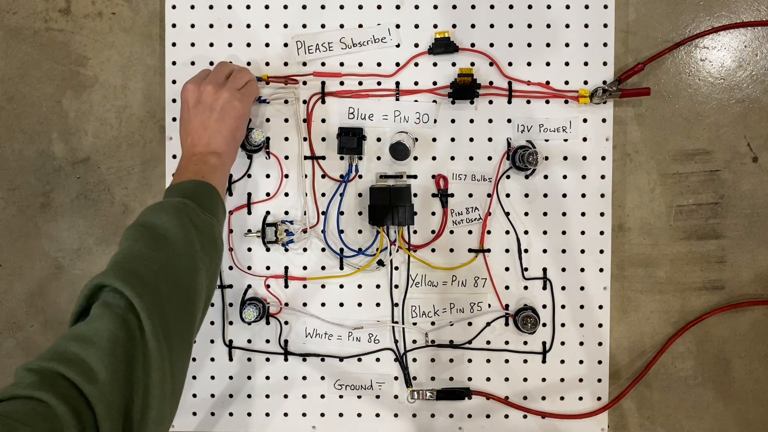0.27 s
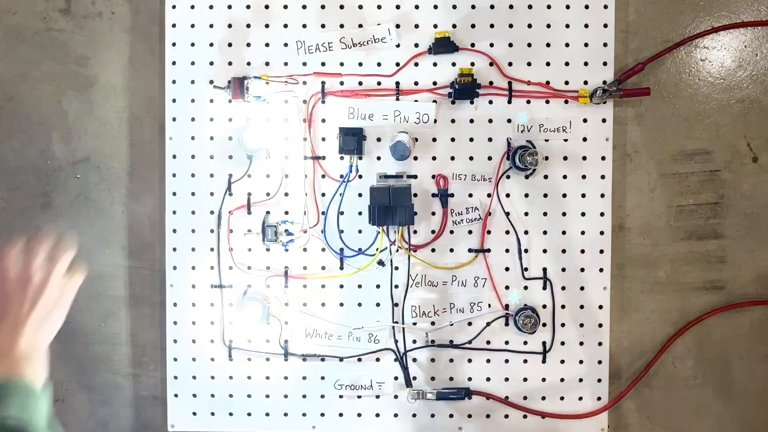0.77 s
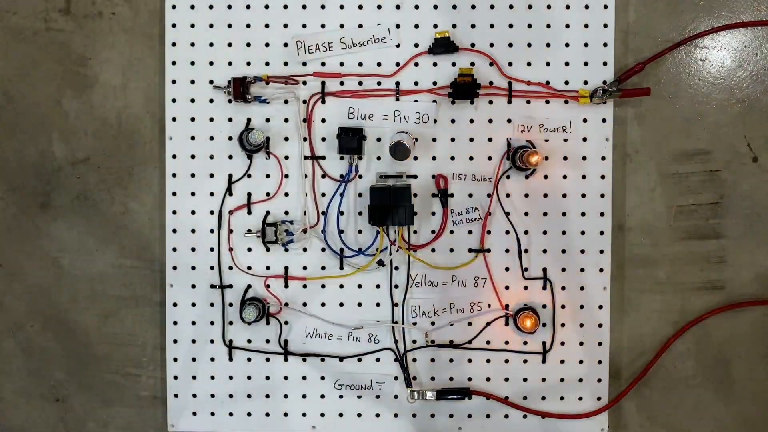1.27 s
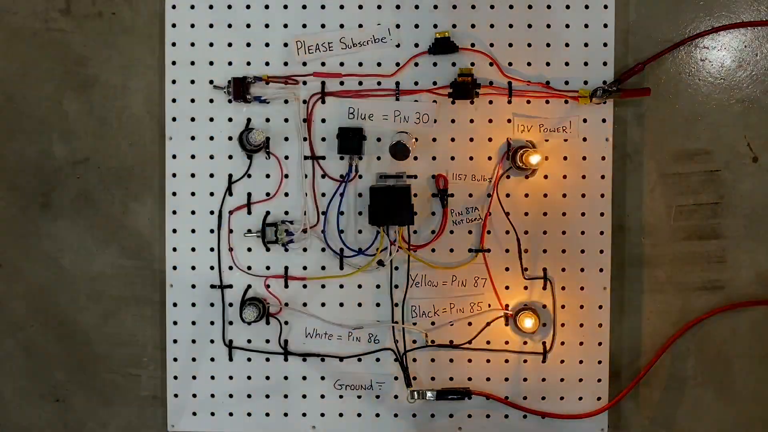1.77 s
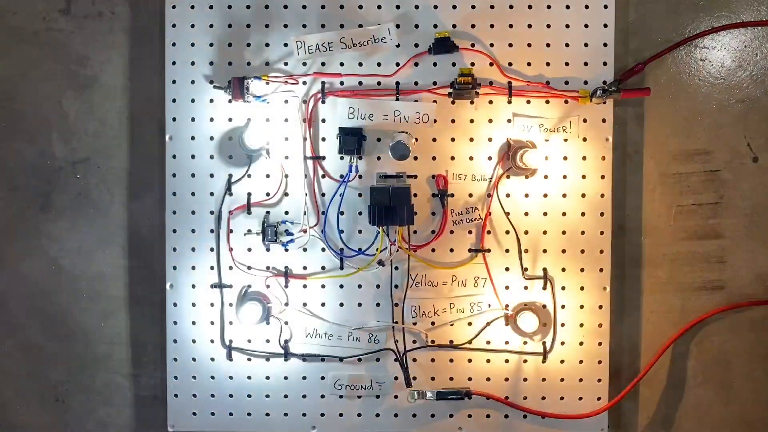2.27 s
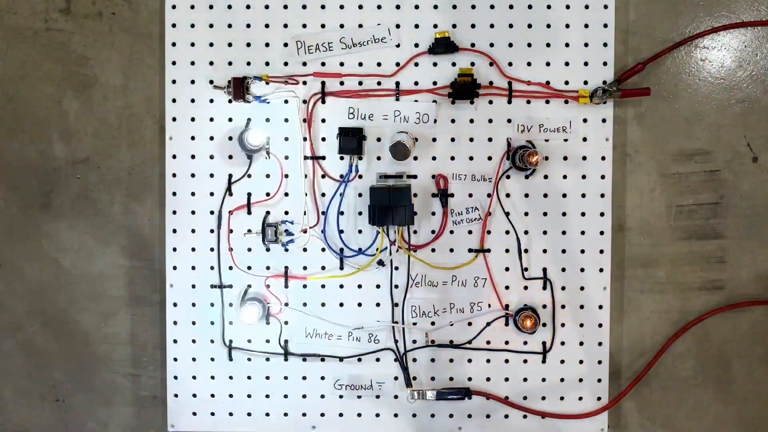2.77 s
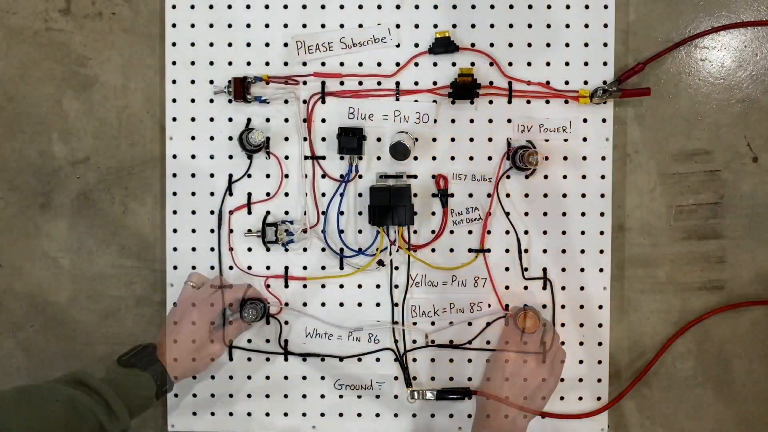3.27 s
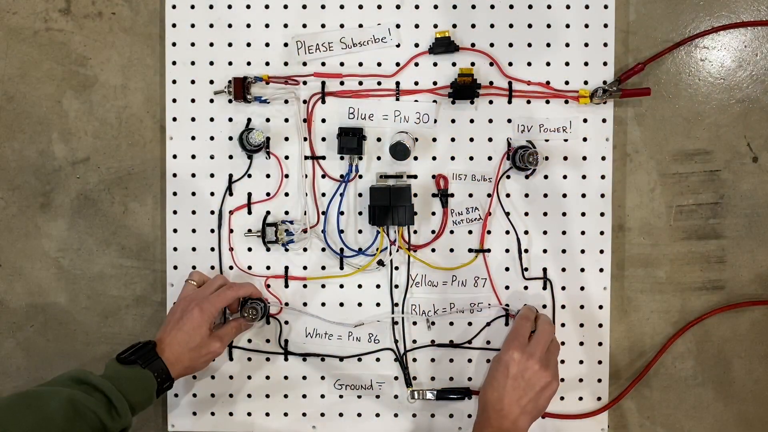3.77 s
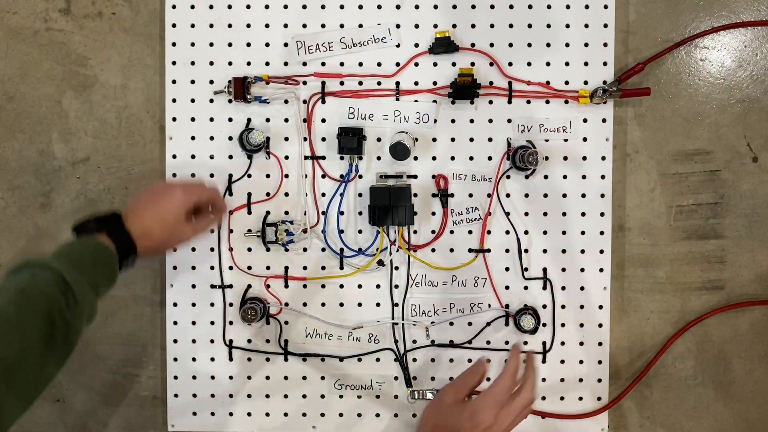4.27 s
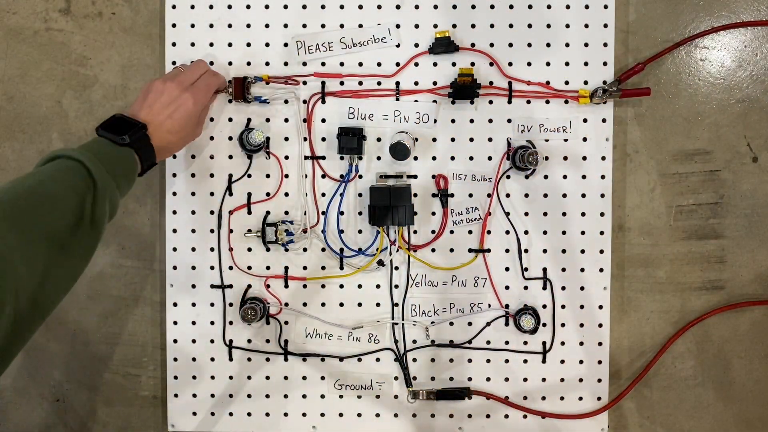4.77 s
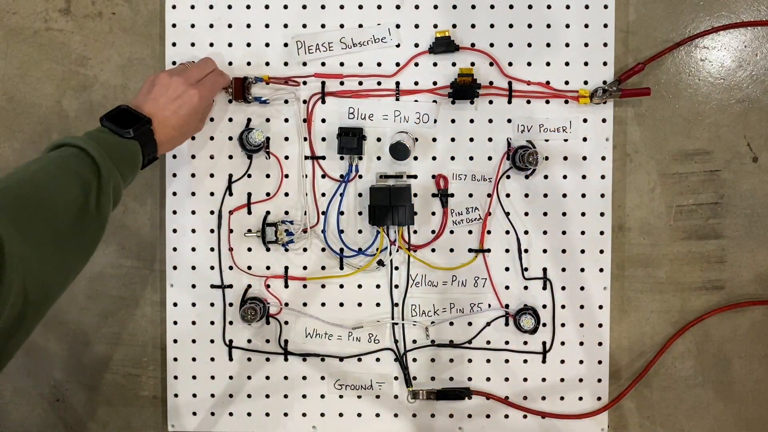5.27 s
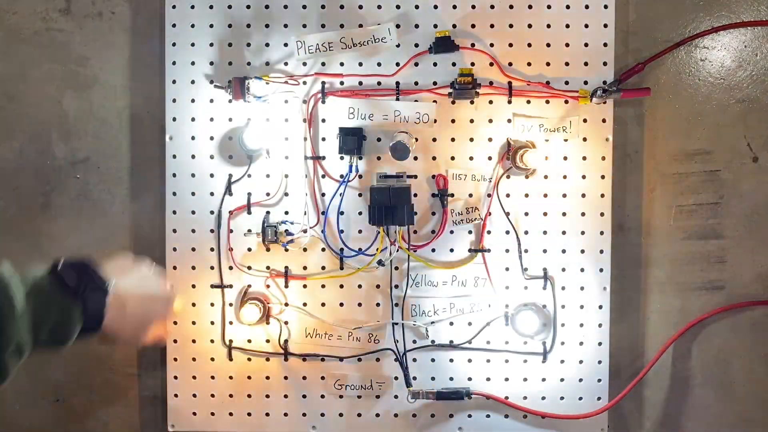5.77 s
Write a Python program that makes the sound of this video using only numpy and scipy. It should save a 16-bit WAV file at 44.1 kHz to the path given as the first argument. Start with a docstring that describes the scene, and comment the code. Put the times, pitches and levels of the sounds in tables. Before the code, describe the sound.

A toggle switch snaps sharply twice in a hard, ringing garage, with finger knocks, bulb scrapes, tiny dry ticks and a low hum arriving late.

```python
"""Over faint hiss, sleeve rustle and a far idling engine, fingers knock and fumble at a pegboard; a toggle switch
snaps, twice in all, and the hard garage rings on. Small dry ticks come and go; bulbs scrape in their sockets; a far
crow caws five times; a truck rolls by, road roar swelling through the wall, then a steady low hum.
Hiss, rustle and roar are shaped random spectra; engines and hum are wavering tones; rumble, crow and scrapes are
resonated noise; knocks, ticks and thuds are resonated puffs; the switch is noise chatter into decaying modes."""
import sys
import numpy as np
from scipy import signal
from scipy.fft import rfft, irfft, next_fast_len
from scipy.io import wavfile
from scipy.ndimage import uniform_filter1d

SR = 44100
rng = np.random.default_rng(int(sys.argv[2]) if len(sys.argv) > 2 else 0)


def inscribe(sig):
    """Save sig as 16-bit PCM at rate SR to the path in sys.argv[1].

    A 1-D sig is mono; a 2-D sig holds one channel per row.
    Samples are clipped to [-1, 1] before scaling.
    """
    pcm = np.round(np.clip(np.atleast_2d(sig).T, -1, 1) * 32767)
    wavfile.write(sys.argv[1], SR, pcm.astype(np.int16))


N = 265085
FRAME, HOP, BLOW, CALL = 1024, 256, 3000, 12000  # lengths in samples

# Levels are those at the source, before the filters of scene() and record().
# background air spectrum: f/Hz, relative density/dB per Hz
AIR_SPECTRUM = [(18, -27.5), (40, -10), (80, -5.5), (150, -15), (280, -19), (440, -26), (620, -23),
                (720, -30), (1400, -37.5), (1800, -45.5), (5000, -45.5), (10000, -55.5), (15800, -51)]
AIR_DB = -65.5

# far idling engine: t/s, level/dB
IDLE = [(0, -65), (.1, -64), (.75, -62), (.85, -50.5), (.93, -82), (1.01, -50), (1.35, -50), (1.58, -56.5),
        (2.18, -45), (2.27, -51.5), (2.4, -62.5), (2.63, -50.5), (2.87, -56.5), (3.1, -74)]
IDLE_HZ, IDLE_OCTAVE_DB, IDLE_UNEVEN_DB = 73.4, -23.5, 2  # octave is relative to the lowest tone
# truck engine, from 4.8 s a steady low hum: t/s, lowest tone f/Hz, level/dB of multiples 1, 2, 3
TRUCK_THEN_HUM = [(2.9, 66.3, -76, -71.5, -65), (3.12, 65.62, -58, -56, -58.5),
                  (3.42, 65.7, -39, -46.5, -44.5), (3.57, 65.88, -42, -52.5, -61),
                  (3.7, 65.1, -42.5, -51.5, -45), (4.1, 64.36, -39, -50.5, -64),
                  (4.42, 64.1, -40, -45, -64), (4.64, 63.07, -47, -49.5, -49.5),
                  (4.8, 65.16, -29.5, -50.5, -78), (4.95, 66, -28.5, -56, -74), (5.3, 66.64, -33, -56, -79),
                  (5.66, 66.7, -32, -58.5, -63), (5.9, 67, -29, -62, -75), (6.01, 65.4, -30, -61, -73)]
TRUCK_THEN_HUM_UNEVEN_DB = 1.3
# low booms gliding as the truck pulls: t/s, length/s, from f/Hz, to f/Hz, level/dB
GLIDES = [(4.33, 0.352, 42, 68, -32), (4.12, 0.249, 58.4, 86.4, -30.5), (4.65, 0.27, 262, 255.6, -48),
          (3.48, .17, 300, 350, -45.5), (3.5, 0.67, 230, 400, -54.5)]

# passing traffic: t/s, road roar level/dB, ground rumble level/dB
TRAFFIC = [(2.5, -77, -68), (2.88, -70.5, -61), (3.079, -60.5, -51), (3.641, -46, -51), (3.85, -50, -47.5),
           (4.28, -49.5, -46), (4.66, -53, -44), (5.2, -54.5, -60.5), (6.01, -53, -50.5)]
# road roar spectrum: f/Hz, relative density/dB per Hz
ROAR_SPECTRUM = [(40, -20.5), (90, -8), (160, -17.5), (220, -11.5), (440, -22.5), (700, -27.5),
                 (1500, -40.5), (5000, -62), (9000, -75.5), (15000, -76.5)]
RUMBLE_LUMPS_DB = -4.5

# crow: t/s, length/s, level/dB
CAWS = [(0.565, 0.25, -67), (0.849, 0.19, -65.5), (1.143, 0.17, -64), (1.462, 0.19, -64), (1.78, 0.18, -63)]
# beak resonances: f/Hz, width/Hz, relative level/dB, 1/e fade/s, delay/s
BEAK = [(1287, 220, 1.5, 0.38, .015), (1418, 144, 2.5, 0.088, .02), (1793, 140, -10, 0.11, 0.0316),
        (2050, 370, -3.5, 0.07, 0.027)]
# slightly hoarse note opening each caw; peak is relative to the caw level
PIP_HZ, PIP_RISE_HZ_PER_S, PIP_S, PIP_PEAK_DB, PIP_UNEVEN_DB = 1745, 600, .06, 1, 1.5

# sleeve and wire rustle, swelling and dying away: t/s, level/dB
RUSTLE = [(0, -73), (.12, -94.5), (.24, -82), (0.449, -72.5), (.6, -80.5), (1.0, -77), (1.3, -79.5),
          (1.6, -83.5), (1.76, -90), (2.2, -96), (2.4, -101.5), (3.499, -100), (3.86, -73.5), (4.2, -76),
          (5.13, -76), (5.501, -72.5), (5.56, -78), (6.01, -76)]
# cloth spectrum: f/Hz, relative density/dB per Hz
CLOTH_SPECTRUM = [(700, -23), (1500, 6), (2700, -1.5), (3900, -4), (5200, -4.5), (6600, -7.5),
                  (9000, -11.5), (11500, -8), (15800, -12.5)]
# sleeve dragging along an edge: t/s, length/s, broad hiss level/dB, centre f/Hz, width/Hz, pitched hiss level/dB
SWISHES = [(1.017, 0.26, -76.5, 2630, 1200, -83), (3.876, 0.22, -70.5, 3800, 600, -66),
           (4.768, 0.22, -68, 5120, 920, -64.5)]

# small dry ticks: t/s, peak/dB, centre f/Hz, 1/e fade of the trailing hiss/s
TICKS = [(1.0394, -57, 3890, .03), (1.6334, -45, 9300, .008), (1.7181, -52, 4700, .03),
         (2.0843, -49, 8600, .05), (2.1804, -64, 4400, .015), (2.3083, -61, 3050, .03),
         (2.4219, -64, 4200, .008), (2.6261, -49, 10920, .012), (3.0117, -63, 10400, .02),
         (3.879, -53, 3340, .03), (1.187, -58, 4300, .02), (1.243, -57, 4500, .02),
         (3.5745, -37, 5600, .02), (3.593, -44, 4500, .03), (1.935, -59, 11200, .006),
         (2.086, -60, 3100, .04), (2.63, -58, 4600, .05)]
TICK_LOW_HZ, TICK_FUZZ_DB, FUZZ_RISE_S = 2700, -19, .003  # fuzz level is relative to the tick peak

# dull bumps on the bench: t/s, peak/dB, f/Hz
THUDS = [(1.235, -49, 407), (3.64, -39.5, 514), (3.675, -41.5, 474)]

# fingers fumbling at first, bulbs and small parts scraping in their mounts, a short rub at the end:
# t/s, rise/s, hold/s, fall/s, level/dB, body slope/dB per octave, grit relative level/dB,
# share by which the resonances rise
SCRAPES = [(0.088, 0.035, 0.11, 0.037, -64, -10, -25, 0.12),
           (3.563, 0.0058, 0.024, 0.042, -42, -2.5, -15.5, 0.019),
           (3.648, 0.037, 0.022, 0.042, -46.5, -2, -16, 0.16),
           (3.743, 0.046, 0.033, 0.028, -45, -1.5, -26, 0.22),
           (3.905, 0.023, 0.037, 0.046, -57, -3, -7, 0.12),
           (4.663, 0.022, 0.025, 0.051, -53, -11.5, -11, 0),
           (4.774, 0.014, 0.037, .03, -57, -10.5, -18, 0.025),
           (5.494, 0.015, 0.01, 0.013, -57, -13.5, -13, 0)]
# socket resonances, shared by all rows: f/Hz, width/Hz, relative level/dB
SOCKET = [(1000, 250, -4), (1280, 300, 0), (1700, 450, -3), (2050, 400, -3), (2400, 300, -3),
          (2850, 300, -3), (3500, 600, -13), (4300, 1100, -13)]
SOCKET_SPREAD = .06  # share by which the resonances shift from row to row
SCRAPE_EDGE_DB = -17  # level at which a scrape starts and ends, relative to its hold
LUMPS_DB, LUMPS_HZ = 1.5, 150  # a scrape catches and lets go

# fingers knocking the board: t/s, peak/dB, f/Hz
KNOCKS = [(0.085, -53, 1120), (0.1442, -30.5, 886), (0.209, -47.5, 988), (0.477, -42, 1350),
          (3.234, -57, 852), (3.469, -58, 857), (3.489, -49.5, 793.2), (4.524, -45.5, 1070),
          (4.606, -40.5, 836), (4.951, -42, 940), (3.772, -45, 1500), (3.821, -35.5, 1250),
          (3.757, -46, 1000), (5.508, -41, 1100)]
BOARD_TOP_HZ = 3400  # soft fingers excite little above this

# switch snaps: t/s, peak/dB, bare crack relative level/dB, lever ring f/Hz, level/dB, t60/s,
# bracket ring f/Hz, level/dB, t60/s, wall tail drive/dB
SNAPS = [(0.253, -14.5, -3, 4190, -58.5, 1.6, 1356, -56.5, 2.1, -26),
         (5.149, -14, -1.5, 3039, -54, .6, 2170, -55.5, 0.34, -29.5)]
# switch body modes: f/Hz, relative level/dB, t60/s
SWITCH_MODES = [(980, -16.5, 0.052), (1078, -0.5, 0.014), (1418, 6.5, 0.014), (1758, 9, 0.017),
                (2450, 10.5, 0.0077), (3010, 20, 0.0077), (4030, -10, 0.0044), (4480, -18.5, 0.06),
                (5150, 2.5, 0.027), (6240, 7.5, 0.012), (7440, 11.5, 0.0043)]
# contacts in a snap, spring letting go to last rebound: delay/s, struck part centre f/Hz,
# weight/dB in snap 1, weight/dB in snap 2
CONTACTS = [(0, 4540, -17.5, -12), (.002, 2300, -7, -1.5), (.0045, 6090, 3.5, 1.5), (.006, 1300, 3, 7),
            (.0085, 3050, 4.5, 5.5), (.0102, 1035, -6, 5.5), (.0135, 1450, -7, -4),
            (.017, 5000, -11.5, -5.5)]
CHATTER_T60_S, FIRST_TICK = .008, 4  # FIRST_TICK: added amplitude of the first sample
STRUCK_OCTAVES, STRUCK_FLOOR_DB = .4, -16  # spread of a contact over the body modes
SING_WIDTH_HZ = 110

# garage decay: f/Hz, t60/s
GARAGE = [(300, 0.57), (1000, 0.99), (3000, 0.61), (6000, 0.57), (9000, 0.5), (15000, 0.34)]
# wall return of each snap: f/Hz, gain/dB
WALLS = [(500, -17.5), (900, -10.5), (1400, -5), (2000, -4.5), (3000, -1), (4250, -6.5), (5000, -7.5),
         (6500, -4.5), (8500, -7.5), (12000, -8), (16000, -5)]
KNOCKS_ECHO_DB, HANDS_ECHO_DB, TICKS_ECHO_DB, SNAPS_ECHO_DB = -15.5, -14, -14, -26

# port likeness: f/Hz, shared share of amplitude (0-1)
LIKENESS = [(150, 1), (230, .99), (330, 0.96), (600, 0.62), (1000, 0.75), (2000, 0.85), (4000, 0.88),
            (6500, 0.97), (15000, 0.96)]
# phase by which the left port leads: f/Hz, phase/rad
LEFT_LEAD = [(0, 0), (1460, 0.62), (2930, 1.0), (5250, 0.4), (6980, 3), (8700, 4.5), (9730, 7),
             (10900, 5.5), (12800, 11), (14400, 9.5), (15800, 11.5), (16200, 9)]
# left minus right: f/Hz, level/dB
TILT = [(100, -0.1), (180, -.3), (400, -1.8), (1200, 0), (2400, -2), (4400, 0), (8000, 0)]
DRIFT_HALF_TURNS_PER_S = 1.5  # pattern change of the scattered field
EDGE_HZ = 16050


def gain_of(db):
    """Amplitude factor of a level in dB."""
    return 10 ** (np.asarray(db) / 20)


def evened(x):
    """Scales to rms 1."""
    return x / np.sqrt(np.mean(x ** 2) + 1e-20)


def read(points, hz):
    """Interpolates a table over log frequency."""
    f, value = np.transpose(points)
    return np.interp(np.log(hz + 1), np.log(f + 1), value)


def add(mix, s, sound):
    """Adds a sound at s seconds, cut at the end of the mix."""
    part = mix[round(s * SR):][:len(sound)]
    part += sound[:len(part)]


def resonate(x, hz, width_hz, passes=1):
    """Shifts hz (fixed or moving) to zero, smooths, shifts back: a resonance of gain 1."""
    turn = np.exp(2j * np.pi * np.cumsum(hz * np.ones(len(x))) / SR)
    r = np.exp(-np.pi * width_hz / SR)
    for _ in range(passes):
        x = 2 * (turn * signal.lfilter([1 - r], [1, -r], x / turn)).real
    return x


def wander(n, cutoff_hz):
    """Slow chance of rms 1."""
    smooth = signal.butter(2, cutoff_hz, fs=SR, output="sos")
    return evened(signal.sosfilt(smooth, rng.standard_normal(n + SR))[SR:])


def hiss(spectrum, band_hz, field_db, patchy_db):
    """Random short-time spectra, scaled over band_hz, times a field over (Hz, s) with drifting patches."""
    t, hz = np.arange(N // HOP + 5) * HOP / SR, np.fft.rfftfreq(FRAME, 1 / SR)
    a, b, patches = rng.standard_normal((len(t), len(hz), 3)).T
    patches = uniform_filter1d(patches, size=12, axis=0)
    patches = evened(uniform_filter1d(patches, size=14, axis=1))
    shape = gain_of(read(spectrum, hz))
    in_band = (hz > band_hz[0]) & (hz < band_hz[1])
    shape /= np.sqrt(np.sum(shape[in_band] ** 2))
    field = field_db(hz[:, None], t) + patchy_db * patches
    spectra = (a + 1j * b) * shape[:, None] * gain_of(field)
    return signal.istft(spectra, nperseg=FRAME, noverlap=FRAME - HOP)[1][:N]


def taps(rows, sharpness, length_s, bare_db):
    """Short puffs of contact noise, near bare and through a broad resonance at each event's pitch."""
    out, t = np.zeros(N), np.arange(BLOW) / SR
    for s, db, hz, *_ in rows:
        puff = rng.standard_normal(BLOW) * np.sqrt(t) * np.exp(-t / length_s)
        ring = resonate(puff, hz, hz / sharpness, passes=2)
        bare = resonate(puff, 2 * hz, 2 * hz, passes=2)
        tap = evened(ring) + gain_of(bare_db) * evened(bare)
        add(out, s, gain_of(db) * tap / abs(tap).max())
    return out


def echo(x, decays, start_s):
    """Sparse taps of random sign, one per 20 samples, each band dying at its own speed; unit energy."""
    train, at = np.zeros(SR), np.arange(0, SR - 20, 20)
    train[at + rng.integers(0, 20, len(at))] = rng.choice([-1., 1.], len(at))
    hz, t, z = signal.stft(train, SR, nperseg=HOP)
    decay = gain_of(-60 * t / read(decays, hz)[:, None])
    tail = signal.istft(z * decay, SR, nperseg=HOP)[1]
    tail *= np.arange(len(tail)) >= start_s * SR
    return signal.oaconvolve(x, tail / np.linalg.norm(tail))[:N]


def background_air():
    """Patchy noise of constant mean level and fixed spectrum."""
    return hiss(AIR_SPECTRUM, (100, 15000), lambda hz, t: AIR_DB, 2.2)


def engines_and_hum():
    """Low multiples as wavering tones, and gliding booms."""
    t = np.arange(N) / SR
    idle_db = np.interp(t, *np.transpose(IDLE), right=-120)
    low_s, *columns = np.transpose(TRUCK_THEN_HUM)
    low_hz, *low_db = (np.interp(t, low_s, column) for column in columns)
    started = t > low_s[0]
    out = np.zeros(N)
    for rate, levels, uneven_db, present in [
            (IDLE_HZ, [idle_db, idle_db + IDLE_OCTAVE_DB], IDLE_UNEVEN_DB, 1),
            (low_hz, low_db, TRUCK_THEN_HUM_UNEVEN_DB, started)]:
        turns = np.cumsum(rate * (1 + 0.0038 * wander(N, 3.97))) / SR
        for k, db in enumerate(levels, 1):
            uneven = np.sqrt(k) * uneven_db * wander(N, 9.9)
            tone = np.sin(2 * np.pi * (k * turns + rng.random()))
            out += np.sqrt(2) * gain_of(db + uneven) * tone * present
    for s, length, from_hz, to_hz, db in GLIDES:
        hz = np.linspace(from_hz, to_hz, round(length * SR))
        boom = np.hanning(len(hz)) * np.sin(2 * np.pi * np.cumsum(hz) / SR)
        add(out, s, np.sqrt(2) * gain_of(db) * boom)
    return out


def traffic():
    """Road roar as shaped hiss over a lumpy ground rumble of narrow-band noise."""
    s, roar_db, rumble_db = np.transpose(TRAFFIC)
    rumble = rng.standard_normal(N)
    for width_hz in (14, 16, 18):
        rumble = resonate(rumble, 46, width_hz)
    lumps_db = np.interp(np.arange(N) / SR, s, rumble_db) + RUMBLE_LUMPS_DB * wander(N, 10.0)
    roar = hiss(ROAR_SPECTRUM, (280, 900), lambda hz, t: np.interp(t, s, roar_db, -120), 1.48)
    return roar + evened(rumble) * gain_of(lumps_db)


def crow():
    """A short hoarse note, then harsh jittered throat pulses through the beak's resonances."""
    out, t = np.zeros(N), np.arange(CALL) / SR
    pip = np.sin(2 * np.pi * (PIP_HZ + PIP_RISE_HZ_PER_S * t / 2) * t)
    pip *= np.sin(np.pi * np.minimum(t / PIP_S, 1) ** 0.5)
    for s, length, db in CAWS:
        turns = np.cumsum(56 * (1 + 0.1 * wander(CALL, 30))) / SR
        rasp = (0.28 + np.exp(-(turns % 1) / 0.52)) * rng.standard_normal(CALL)
        add(out, s, gain_of(db + PIP_PEAK_DB + PIP_UNEVEN_DB * wander(CALL, 70)) * pip)
        gate = np.clip(np.minimum(t / 0.012, (length - t) / 0.048), 0, 1)
        for hz, width_hz, band_db, fade, delay in BEAK:
            band = evened(resonate(rasp, hz, width_hz, passes=3))
            add(out, s + delay, gain_of(db + band_db) * band * np.exp(-t / fade) * gate)
    return out


def rustle():
    """Cloth hiss flickering from moment to moment, swelling and taking on a pitch in each swish."""
    s, db = np.transpose(RUSTLE)
    flicker = rng.standard_normal(N // HOP + 5)

    def arch(t, length):
        return np.sqrt(abs(np.sin(np.pi * np.clip(t / length, 0, 1))))

    def field_db(hz, t):
        swell = gain_of(np.interp(t, s, db))
        for start, length, broad_db, *_ in SWISHES:
            swell = swell + gain_of(broad_db) * arch(t - start, length)
        return 20 * np.log10(swell) + 1.2 * flicker

    out = hiss(CLOTH_SPECTRUM, (3500, 6500), field_db, 1.7)
    t = np.arange(CALL) / SR
    for start, length, _, hz, width_hz, swish_db in SWISHES:
        swish = evened(resonate(rng.standard_normal(CALL), hz, width_hz, passes=2))
        add(out, start, gain_of(swish_db) * swish * arch(t, length) ** 2)
    return out


def fuzz():
    """A soft puff of band noise rises into each tick and fades after it."""
    out, t = np.zeros(N), (np.arange(CALL) - HOP) / SR
    for s, db, hz, fall in TICKS:
        puff = evened(resonate(rng.standard_normal(CALL), hz, hz / 5, passes=2))
        add(out, s + t[0], gain_of(db + TICK_FUZZ_DB) * puff * np.exp(np.minimum(t / FUZZ_RISE_S, -t / fall)))
    return out


def ticks():
    """Contact puffs with soft fuzz, thinned by a high-pass."""
    thin = signal.butter(4, TICK_LOW_HZ, "high", fs=SR, output="sos")
    return signal.sosfilt(thin, taps(TICKS, sharpness=1.3, length_s=0.002, bare_db=-27) + fuzz())


def thuds():
    """Longer, lower contact puffs: bumps on the bench."""
    return taps(THUDS, sharpness=2.5, length_s=0.0044, bare_db=-13.5)


def scrapes():
    """Fumbling, scraping and a rub as uneven slips: dense clicks into resonances, with a gritty top."""
    out, t = np.zeros(N), np.arange(CALL) / SR
    for s, rise, hold, fall, db, slope_db, grit_db, pitch_rise in SCRAPES:
        size = gain_of(2.4 * np.minimum(rng.exponential(1, CALL), 4))
        slips = rng.standard_normal(CALL) * size * (rng.random(CALL) < 3800 / SR)
        grip = 1 + SOCKET_SPREAD * rng.uniform(-1, 1, len(SOCKET))
        slide = 1 + pitch_rise * (np.minimum(t / (rise + hold + fall), 1) - 1)
        body = np.zeros(CALL)
        for (hz, width_hz, mode_db), shift in zip(SOCKET, grip):
            sloped_db = mode_db + slope_db * np.log2(hz / SOCKET[0][0])
            body += gain_of(sloped_db) * evened(resonate(slips, hz * shift * slide, width_hz, passes=2))
        grit = gain_of(grit_db) * evened(resonate(slips, 3000, 8100))
        edge = np.maximum(np.maximum(1 - t / rise, (t - rise - hold) / fall), 0)
        level_db = db + SCRAPE_EDGE_DB * edge + LUMPS_DB * wander(CALL, LUMPS_HZ)
        add(out, s, gain_of(level_db) * (evened(body) + grit))
    return out


def knocks():
    """Contact puffs in the board's broad resonance, dulled by soft fingers."""
    soft = signal.butter(2, BOARD_TOP_HZ, fs=SR, output="sos")
    return signal.sosfilt(soft, taps(KNOCKS, sharpness=2.2, length_s=0.0016, bare_db=-17))


def snap_tails():
    """The garage rings on after each snap, dense and broad."""
    size = next_fast_len(N)
    blows = np.zeros(N)
    blows[[round(row[0] * SR) for row in SNAPS]] = gain_of([row[-1] for row in SNAPS]) * np.sqrt(HOP)
    tail = echo(blows, GARAGE, 0.0031)
    walls = gain_of(read(WALLS, np.fft.rfftfreq(size, 1 / SR)))
    return irfft(rfft(tail, size) * walls, size)[:N]


def switch():
    """Contacts chatter, bare and ringing the part of the body struck; lever and bracket sing on faintly."""
    out, t, long = np.zeros(N), np.arange(BLOW) / SR, np.arange(CALL) / SR
    for k, (s, db, crack_db, *rings, _) in enumerate(SNAPS):
        bare, body = np.zeros(BLOW), np.zeros(BLOW)
        for delay, struck_hz, *weights_db in CONTACTS:
            burst = rng.standard_normal(BLOW) + FIRST_TICK * (t == 0)
            chatter = gain_of(weights_db[k] - 60 * t / CHATTER_T60_S) * burst
            ring = np.zeros(BLOW)
            for hz, mode_db, t60 in SWITCH_MODES:
                nearness = np.exp(-(np.log2(hz / struck_hz) / STRUCK_OCTAVES) ** 2)
                mode = gain_of(mode_db - 60 * t / t60) * np.sin(2 * np.pi * hz * t)
                ring += (gain_of(STRUCK_FLOOR_DB) + nearness) * mode
            add(bare, delay, chatter)
            add(body, delay, signal.fftconvolve(chatter, evened(ring))[:BLOW])
        snap = evened(body) + gain_of(crack_db) * evened(np.gradient(bare))
        add(out, s, gain_of(db) * snap / abs(snap).max())
        for ring_hz, ring_db, t60 in np.reshape(rings, (-1, 3)):
            sing = evened(resonate(rng.standard_normal(CALL), ring_hz, SING_WIDTH_HZ, passes=2))
            fade_out = np.sqrt(abs(np.cos(np.pi * long / long[-1] / 2)))
            add(out, s, gain_of(ring_db - 60 * long / t60) * sing * fade_out)
    return out


def scene():
    """All sources reach both ports; snaps and knocks arrive alike, the rest partly scattered by frequency."""
    small = signal.butter(4, 780, "high", fs=SR, output="sos")  # small parts radiate no bass
    rubbed, snaps, board = signal.sosfilt(small, [scrapes(), switch(), knocks()])
    hands = rubbed + thuds()
    dry_ticks = ticks()
    far = crow()
    left = background_air() + engines_and_hum() + traffic() + rustle()
    left += far + gain_of(-9.5) * echo(far, [(1000, 1.16), (2500, 0.42)], 0.021)
    left += snap_tails() + hands + dry_ticks
    to_room = gain_of(KNOCKS_ECHO_DB) * board + gain_of(HANDS_ECHO_DB) * hands
    to_room += gain_of(TICKS_ECHO_DB) * dry_ticks + gain_of(SNAPS_ECHO_DB) * snaps
    left += echo(to_room, GARAGE, 0.0038)

    size = next_fast_len(N)
    same = np.clip(read(LIKENESS, np.fft.rfftfreq(size, 1 / SR)), 0, 1)
    drift = np.pi * DRIFT_HALF_TURNS_PER_S * np.arange(N) / SR
    scattered = sum(echo(left * turn(drift), [(300, 0.27), (8000, 0.1)], 0) for turn in (np.sin, np.cos))
    right = same * rfft(left, size) + np.sqrt(1 - same ** 2) * rfft(scattered, size)
    return np.array([left, irfft(right, size)[:N]]) + snaps + board


def record(dry):
    """The two ports differ in phase and level by frequency; then the band limit."""
    size = next_fast_len(N + BLOW)
    hz = np.fft.rfftfreq(size, 1 / SR)
    half = gain_of(read(TILT, hz) / 2) * np.exp(1j * np.interp(hz, *np.transpose(LEFT_LEAD)) / 2)
    low_cut = 1 / (1 + (33 / (hz + 1)) ** 6)  # the microphone drops the deepest bass
    ports = irfft(rfft(dry, size) * low_cut * np.array([half, 1 / half]), size)[:, :N]
    edge = signal.firwin(511, EDGE_HZ, window=("kaiser", 9), fs=SR)
    return signal.oaconvolve(ports, edge[None], "same")


dry = scene()
out = record(dry)
inscribe(out)
```